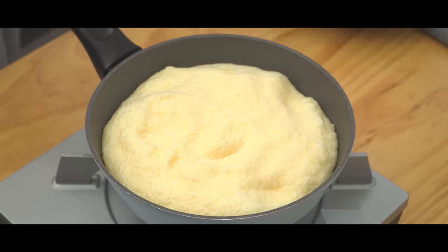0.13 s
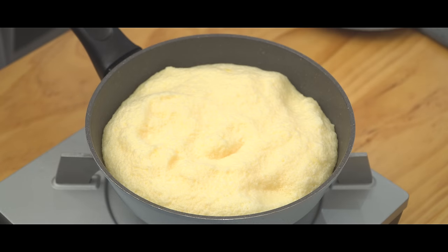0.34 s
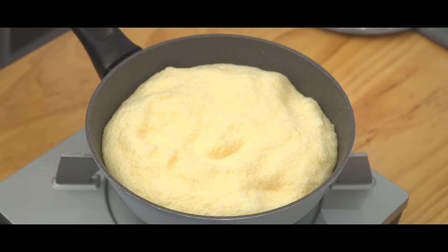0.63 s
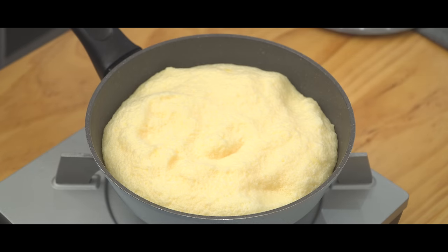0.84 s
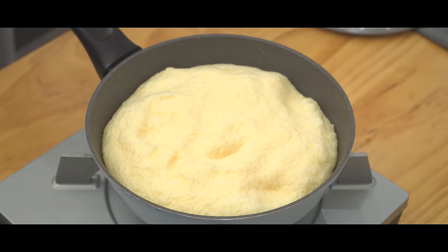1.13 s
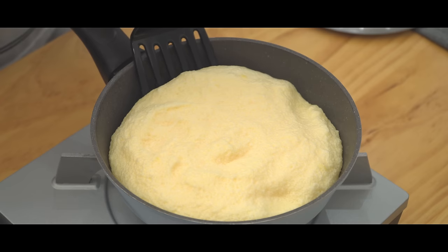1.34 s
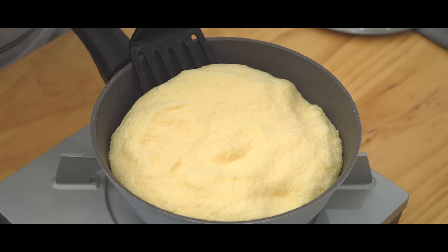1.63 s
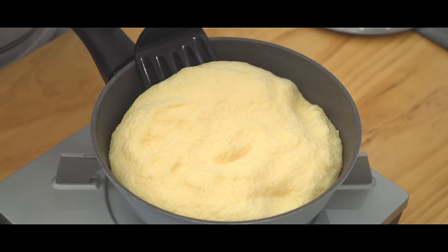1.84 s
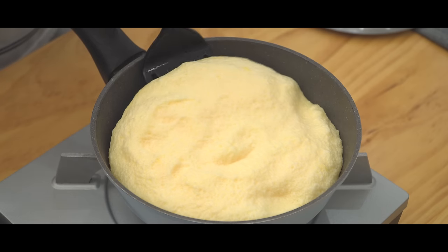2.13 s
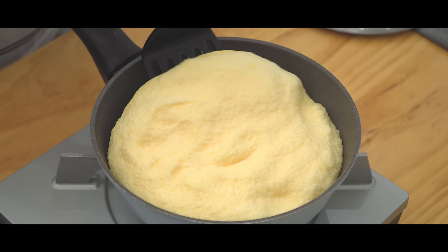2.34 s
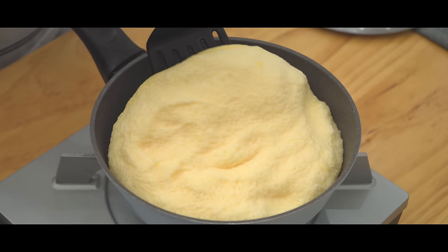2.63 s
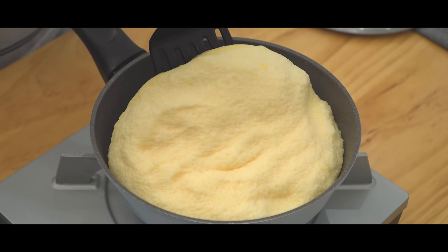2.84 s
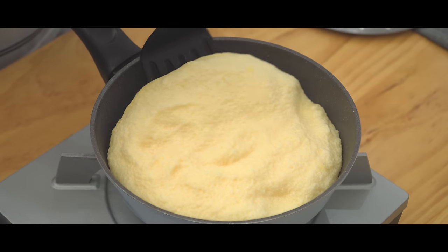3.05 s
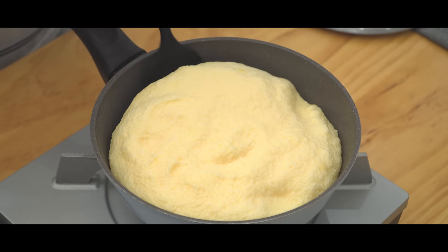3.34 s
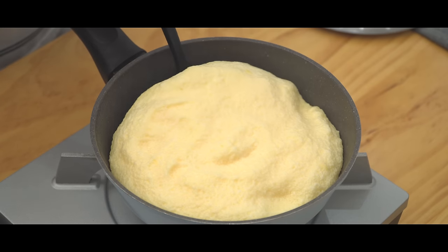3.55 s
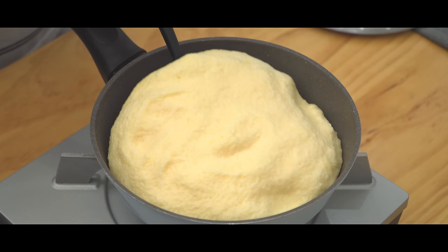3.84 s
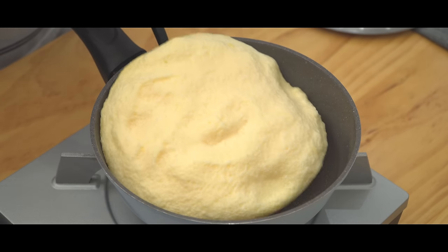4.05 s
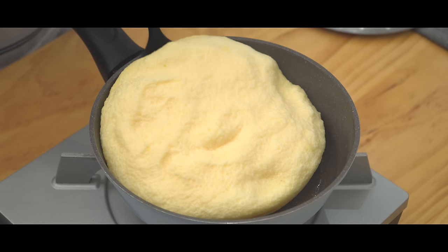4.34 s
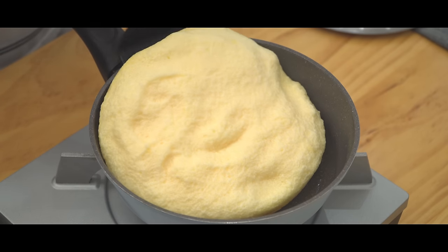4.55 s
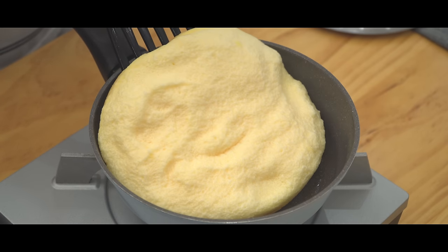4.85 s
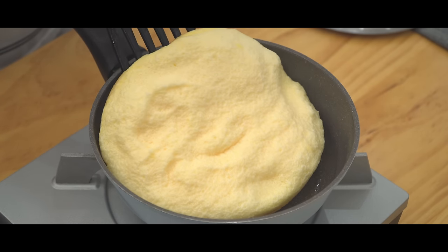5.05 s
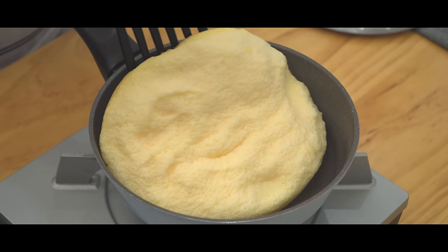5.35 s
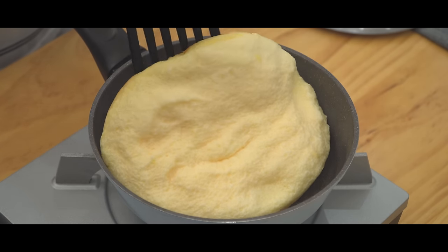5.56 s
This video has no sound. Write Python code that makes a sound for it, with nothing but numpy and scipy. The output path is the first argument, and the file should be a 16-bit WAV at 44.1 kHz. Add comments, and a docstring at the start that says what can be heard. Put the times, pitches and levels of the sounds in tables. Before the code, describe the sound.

Quiet kitchen with faint hum and a thin, regular insect-like chirr. A spatula clatters off a plate slightly away, then knocks a small pan several times, close and dry. The hum steps up, with low handling rumble. Frying swells, the shaft knocks the rim dully, and the blade rubs under the omelette with sharp fat pops, wet crackling and a quick run of snaps. Close microphone, small room reverberation.

```python
"""In a kitchen, a fluffy omelette cooks in a small pan on a portable stove, over mains hum and a faint chirring.
A plastic spatula clatters off a plate, knocks the pan and slides under the egg. Solids sound as decaying
modes plus dense noise bands; the wet underside crackles on hot metal as random grains and peels off in a run
of snaps. Frying swells at each lift of the egg, and fat pops are filtered spikes with a brief spray."""
import sys
import numpy as np
from scipy import signal
from scipy.fft import rfft, irfft
from scipy.io import wavfile

SR = 44100
rng = np.random.default_rng(int(sys.argv[2]) if len(sys.argv) > 2 else 0)


def transcribe(u):
    """Save the signal u as a 16-bit wav file named by the first command-line argument.

    u: samples, shape (n,) or (channels, n), limited to [-1, 1]; the rate is SR.
    q: integer samples, one column per channel.
    """
    v = np.clip(np.atleast_2d(u).T, -1, 1)
    q = np.round(v * 32767).astype(np.int16)
    wavfile.write(sys.argv[1], SR, q)


N = 251037
T = np.arange(N) / SR

# Levels in the tables are relative: most sources apply a further gain of their own.
# steady narrow bands in the background: centre_hz, width_hz, level_db
WHIRR_BANDS = [(2502, 290, -72), (3242, 240, -72), (3983, 190, -73.5), (5276, 280, -72.5), (8300, 190, -88),
               (11170, 100, -84), (12200, 136, -86)]
# spectrum of the room air: frequency_hz, relative_db
AIR_SPECTRUM = [(25, -15), (45, -6), (80, -10.5), (160, -8), (300, -15), (560, -19.5), (940, -18.5),
                (2000, -20.5), (2500, -21), (4600, -26.5), (5600, -21), (6200, -34), (14000, -34.5),
                (16000, -42)]
# spectrum of the handling rumble: frequency_hz, relative_db
HOLDING_SPECTRUM = [(20, -30), (45, -4.5), (90, -8), (250, -10.5), (500, -18.5), (1500, -38.5)]
# spectrum of frying and crackling egg: frequency_hz, relative_db
SIZZLE_SPECTRUM = [(300, -32), (1200, 3), (3500, 4), (6000, 0.5), (8800, 2.5), (12000, -1), (16000, -5.5)]
# lifts of the egg, when fat runs onto bare metal: peak_s, half_length_s, frying_db
EGG_LIFTS = [(2.81, 0.18, -62), (3.966, 0.15, -63.5), (5.13, 0.057, -69), (5.684, 0.14, -74)]
# blows as the spatula leaves the plate: start_s, level_db, plate_ring_db
CLATTER_BLOWS = [(0.6851, -17.5, -3), (0.703, -36, -13), (0.712, -22, -17), (0.725, -23.5, -10),
                 (0.7317, -28, -6.5), (0.776, -39, -10)]
# modes of the plate: frequency_hz, level_db, t60_s
PLATE_MODES = [(527, -3, .26), (565, -3, .24), (633, -8, .42), (735, -14, .24), (790, -9, .22),
               (904, -12, .34), (1022, -11, .5), (1125, -18, .3), (1275, -9, .16), (1313, 0, .27),
               (1422, -6, .3), (1463, -11, .38), (1572, -11, .16), (1720, -4, .15), (1764, -8, .52),
               (1797, -8, .18), (1832, -9, .24), (1950, -12, .22), (2030, -12, .27), (2262, -17, .58),
               (2350, -15, .19), (2837, -23, .52), (3295, -27, .45), (4360, -35, .35), (4732, -36, .25),
               (6180, -40, .25), (6600, -40, .3), (7200, -43, .2)]
# quickly damped modes of the bouncing spatula: frequency_hz, level_db, t60_s
BOUNCE_MODES = [(580, -8.5, 0.055), (934, -4.5, 0.044), (1317, 5.5, 0.043), (1380, -2.5, 0.01),
                (1750, -3.5, 0.05), (2380, -2, 0.02), (3800, -25, 0.037)]
# noise bands of the plate's short clack: frequency_hz, level_db, t60_s
CLACK_BANDS = [(34.8, -35, 0.17), (75, -12.5, 0.23), (116, -16, 0.18), (280, -24, 0.17), (580, -4, 0.058),
               (980, -6, 0.042), (1590, 2.5, 0.042), (2560, -14, 0.058), (4170, -23, 0.035),
               (6940, -34.5, 0.048), (11800, -73, .03)]
# colour of a blow that drives all pitches alike: frequency_hz, level_db
FLAT_COLOUR = [(1000, 0)]
# blade on the pan: start_s, level_db, rattle_db, ring_time_factor,
# thud_db, body_db, ring_db, clack_db, tick_db (a blade left pressed on damps the pan)
BLADE_TAPS = [(1.3254, -20, 1, 1.13, -14, -20.5, -12.5, -15.5, -38),
              (1.692, -13, -4.5, 0.85, -26.5, -20.5, -18, -23, -18.5),
              (1.732, -39.5, 3, 0.88, -7, -13, -7, -30, -74),
              (1.824, -35, -3.5, 1.1, -6, -16, -12, -22, -30),
              (1.934, -15.5, -6.5, 0.71, -15.5, -18, -14, -23.5, -15),
              (2.087, -20.5, -2.5, 0.94, -17, -13.5, -9.5, -17.5, -20),
              (3.267, -17.5, 1.5, .72, -26, -17, -12.5, -17, -21.5)]
# pitches of those five parts: frequency_hz
TAP_PART_HZ = [90, 280, 1200, 3600, 9000]
# modes of the pan on its stove: frequency_hz, level_db, t60_s
PAN_MODES = [(44, -44, 0.22), (152.5, -3.5, 0.15), (215.6, -14.5, 0.15), (365, -5, 0.13),
             (790, -10.5, 0.075), (1056, -4, 0.04), (1310, 3.5, 0.018), (1470, -3, 0.024),
             (1870, -10.5, 0.11), (2024, -3.5, 0.046), (2474, -11.5, 0.13), (3217, -9, 0.051),
             (3690, -4, 0.05), (3720, -2, 0.057), (3920, -4, 0.021), (4450, -6, 0.063), (4880, -2, 0.043),
             (5615, -3, 0.042), (6750, -5.5, 0.034), (7380, -9, 0.027), (7870, -3, 0.04),
             (8370, -7.5, 0.05), (8450, -8, 0.018), (8840, -5, 0.028)]
# noise bands of the rattling blade and pan support: frequency_hz, level_db, t60_s
RATTLE_BANDS = [(40.7, -8, 0.28), (121, -7, 0.32), (302, 5.5, 0.058), (564, -6.5, 0.063),
                (1300, -2.5, 0.078), (2930, 3, 0.034), (6000, 2, 0.02), (9200, 6.5, 0.035),
                (15100, -14, .025)]
# egg and pan settling softly: start_s, level_db, pitch_hz
SETTLING_BUMPS = [(1.68, -37, 302), (3.488, -30, 220), (3.618, -37, 147), (3.771, -39, 168),
                  (4.064, -36, 124), (4.988, -44, 68.6), (5.193, -36, 84)]
# loudest single pops of fat: start_s, level_db, lower_snap_db
FAT_POPS = [(2.2594, -33, 4), (2.2744, -34, -1), (2.449, -33, 1), (3.1835, -32, -8), (3.2087, -29, -8),
            (3.3832, -16.5, -35), (3.3939, -14, -35), (3.419, -19.5, -19), (3.5095, -17, -33),
            (3.5204, -12.5, -41), (3.5932, -24, -27), (3.75, -23, -19), (3.7965, -24, -28),
            (3.8206, -27, -29), (3.838, -26, -14), (4.8675, -40.5, -3.5), (4.909, -38, -0.5),
            (5.0726, -44.5, 6), (5.1024, -42, 10), (5.3672, -44, -2.5), (5.6477, -33.5, -10)]
# spatula shaft on the rim: start_s, level_db, thud_db, body_db, ring_db, clack_db, tick_db
SHAFT_KNOCKS = [(3.162, -19.5, -18, -9.5, -13.5, -19, -36.5), (3.182, -30.5, -9, -17, -9, -35, -19.5),
                (4.338, -14.5, -20, -7, -23, -14, -41.5), (4.416, -22.5, -16, -6, -13.5, -31.5, -34.5)]
# pitches of those five parts: frequency_hz
KNOCK_PART_HZ = [90, 280, 1050, 2000, 9000]
# modes of the plastic shaft: frequency_hz, level_db, t60_s
SHAFT_MODES = [(128, -1, 0.036), (268, 6, 0.035), (440, 0, 0.016), (830, -17, 0.023), (1043, -7, 0.11),
               (1326, -1, 0.016), (1966, 0.5, 0.04), (3080, -17, 0.081), (4050, -1.5, 0.045)]
# noise bands of the shaft's dull contact: frequency_hz, level_db, t60_s
THUD_BANDS = [(40, -11, 0.16), (119, -8.5, 0.18), (296, -19, 0.06), (567, -2.5, 0.031), (1150, -6, 0.058),
              (2400, -2.5, .025), (5000, -10.5, 0.081), (9000, -0.5, 0.024), (15000, -18, .025)]
# blade shoved under the egg: start_s, rise_s, t60_s, rubbing_db, rumble_db
BLADE_SHOVES = [(3.29, .04, 0.64, -60, -49), (3.39, 0.055, 0.67, -51, -46), (3.67, .02, 0.43, -62, -53.5),
                (3.85, 0.027, 0.44, -50.5, -49.5), (4.18, 0.026, 0.5, -58.5, -48)]
# spectrum of the rubbing blade: frequency_hz, relative_db
RUBBING_SPECTRUM = [(300, -2.5), (700, -10), (1100, -3.5), (2000, -4.5), (3500, -12.5), (7000, -21),
                    (14000, -21)]
# spectrum of the rumble of a shove: frequency_hz, relative_db
RUMBLE_SPECTRUM = [(25, -10), (60, 4.5), (130, 1.5), (260, 3.5), (420, -12), (800, -16), (2000, -57)]
# wet egg meeting hot metal: start_s, rise_s, t60_s, level_db
WET_CRACKLES = [(3.364, 0.019, 0.7, -43.5), (3.489, 0.018, 0.42, -48)]
# spectrum of the thinner crackle of the peeling egg: frequency_hz, relative_db
PEELING_SPECTRUM = [(300, -67), (1200, -5.5), (3500, -10), (6000, -14), (8300, 1.5), (11800, 0),
                    (13500, -27), (16000, -33)]
# reverberation of the kitchen: frequency_hz, level_db, t60_s
ROOM_BANDS = [(30.2, -4, 0.69), (100, -17, 0.72), (506, -6.5, 0.49), (1990, -3.5, 0.48), (6000, 3, 0.34),
              (14000, -9.5, 0.2)]

# the spatula first touches the pan here: hum jump, handling rumble and stronger frying start from it
TOUCH_S = 1.32
# the hum before the touch, on the touch, and its ebb afterwards
MAINS_HZ, HUM_IDLE_DB, HUM_TOUCHED_DB, HUM_EBB_DB_PER_S = 100, -61.5, -49.5, 5
# chirring on a steady beat
CHIRP_FIRST_S, CHIRP_PERIOD_S, CHIRP_LENGTH_S, CHIRP_DB = .222, .277, .18, -66
# handling rumble: hands off, spatula put into the pan, and its easing afterwards
HANDS_OFF_DB, HOLDING_DB, EASING_DB_PER_S = -79.5, -58, 1.45
# gentle frying: egg left alone, and the part added when the blade disturbs it
FRY_IDLE_DB, FRY_DISTURBED_DB = -85, -71
# the egg peels off the metal
PEEL_S, PEEL_RISE_S, PEEL_T60_S, PEEL_DB = 3.666, .0052, .49, -42
# the run of snaps as it lets go: mean gap, mean level, relative level of the lower snap
SNAP_GAP_S, SNAP_DB, SNAP_LOW_DB = .007, -26.5, -18

# half-octave bands of unrelated noise at rms 1, the stock for every burst
BAND_HZ = 32 * 2 ** (np.arange(19) / 2)
BANDS = []
for centre_hz in BAND_HZ:
    edges_hz = [centre_hz / 2 ** .25, centre_hz * 2 ** .25]
    band_filter = signal.butter(3, edges_hz, "band", fs=SR, output="sos")
    band_noise = signal.sosfilt(band_filter, rng.standard_normal(N))
    BANDS.append(band_noise / np.sqrt(np.mean(band_noise ** 2) + 1e-20))


def from_db(db):
    """Logarithmic level: decibels to amplitude gain."""
    return 10 ** (np.asarray(db) / 20)


def rms_one(x):
    """Normalisation of power: scale to rms 1."""
    return x / np.sqrt(np.mean(x ** 2) + 1e-20)


def at_hz(rows, hz, column=1):
    """Interpolation on a log-frequency axis: read one column of a table."""
    rows = np.array(rows)
    return np.interp(np.log(hz + 1e-9), np.log(rows[:, 0]), rows[:, column])


def add(track, s, sound):
    """Superposition: mix a sound in at time s."""
    start = max(round(s * SR), 0)
    track[start:start + len(sound)] += sound[:N - start]


def coloured(x, spectrum):
    """Linear filtering: weight the spectrum of x and scale to rms 1."""
    gain = from_db(at_hz(spectrum, np.fft.rfftfreq(N, 1 / SR)))
    return rms_one(irfft(rfft(x) * gain, N))


def narrow_noise(hz, width):
    """Band limitation: noise in one narrow band, at rms 1."""
    sos = signal.butter(2, [hz - width / 2, hz + width / 2], "band", fs=SR, output="sos")
    return rms_one(signal.sosfilt(sos, rng.standard_normal(N)))


def dying(t60):
    """Exponential damping: one second of decay, falling 60 dB in t60."""
    return np.exp(-np.minimum(np.log(1000) * T[:SR] / t60, 30))


def surge(s, rise_s, t60=np.inf):
    """Build-up and damping: gain that rises from time s, then dies away or holds."""
    rise = np.clip((T - s) / rise_s, 0, 1)
    decay = np.log(1000) * np.maximum(T - s - rise_s, 0) / t60
    return rise * np.exp(-np.minimum(decay, 30))


def struck(modes, colour, spread_db, stretch=1):
    """Modal superposition: damped sines after one blow, of alternating sign and random strength."""
    ringing = 0
    for k, (hz, db, t60) in enumerate(modes):
        strength = from_db(db + at_hz(colour, hz) + spread_db * rng.standard_normal())
        ringing += (-1) ** k * strength * dying(t60 * stretch) * np.sin(2 * np.pi * hz * T[:SR])
    return ringing


def burst(table, colour):
    """High modal density: half-octave noises that swell in a cycle and die at their own pace."""
    start = rng.integers(SR // 2, N - SR)
    out = np.zeros(SR)
    for hz, band in zip(BAND_HZ, BANDS):
        level = from_db(at_hz(table, hz) + at_hz(colour, hz))
        swell = np.minimum(T[:SR] * hz, 1)
        out += level * band[start:start + SR] * dying(at_hz(table, hz, 2)) * swell
    return out


def grains(per_s, spread_db, clump_db=0):
    """Random point process: tiny steam bubbles burst in clumps, a few much louder than the rest."""
    sizes = from_db(spread_db * np.minimum(rng.exponential(1, N), 4))
    clumps = from_db(clump_db * np.tanh(narrow_noise(60, 80)))
    return (rng.random(N) < per_s * clumps / SR) * sizes * rng.choice([-1, 1], N)


def hum(rise_s=0.09):
    """Periodic excitation: a mains sine jumps when the spatula meets the pan, then ebbs steadily."""
    touched_db = HUM_TOUCHED_DB - HUM_EBB_DB_PER_S * (T - TOUCH_S)
    db = HUM_IDLE_DB + surge(TOUCH_S, rise_s) * (touched_db - HUM_IDLE_DB)
    return from_db(db) * np.sqrt(2) * np.sin(2 * np.pi * MAINS_HZ * T)


def background(air_db=-60):
    """Stationary noise: broadband room air and a thin whirr of narrow bands, with the mains hum."""
    air = from_db(air_db) * coloured(rng.standard_normal(N), AIR_SPECTRUM)
    whirr = sum(from_db(db) * narrow_noise(hz, width) for hz, width, db in WHIRR_BANDS)
    return air + whirr + hum()


def holding():
    """Structure-borne rumble: low noise rises as the spatula is put into the pan, then eases."""
    eased = from_db(HOLDING_DB - EASING_DB_PER_S * (T - TOUCH_S))
    held = from_db(HANDS_OFF_DB) + eased * surge(TOUCH_S, rise_s=0.022)
    return coloured(rng.standard_normal(N), HOLDING_SPECTRUM) * held


def frying_gain(onset_s=1.0):
    """Boiling on contact: frying picks up from the first touch, and swells at each lift of the egg."""
    lifted = sum(from_db(db) * np.exp(-((T - s) / half_s) ** 2) for s, half_s, db in EGG_LIFTS)
    return from_db(FRY_IDLE_DB) + from_db(FRY_DISTURBED_DB) * surge(TOUCH_S, onset_s) + lifted


def gentle_frying():
    """Bubble noise: sparse random grains under the changing frying gain."""
    return coloured(grains(per_s=1500, spread_db=6.0), SIZZLE_SPECTRUM) * frying_gain()


def insect(hz=5510, width=280, edge_s=0.11, waver_db=2.0):
    """Amplitude modulation: gated narrow noise chirrs between three and four times a second."""
    gate = np.zeros(N)
    for s in np.arange(CHIRP_FIRST_S - CHIRP_PERIOD_S, T[-1] + CHIRP_PERIOD_S, CHIRP_PERIOD_S):
        level = from_db(CHIRP_DB + waver_db * rng.standard_normal())
        gate += level * np.clip((CHIRP_LENGTH_S / 2 - abs(T - s)) / edge_s + .5, 0, 1)
    return gate * narrow_noise(hz, width)


def plate(ring_db=-1, bounce_db=3, clack_db=2):
    """Impact excitation: the first blow sets the plate ringing; the bouncing spatula mostly clacks."""
    out = np.zeros(N)
    for s, db, plate_db in CLATTER_BLOWS:
        ring = from_db(ring_db + plate_db) * struck(PLATE_MODES, FLAT_COLOUR, spread_db=-1.3)
        bounce = from_db(bounce_db) * struck(BOUNCE_MODES, FLAT_COLOUR, spread_db=2.5)
        clack = from_db(clack_db) * burst(CLACK_BANDS, FLAT_COLOUR)
        add(out, s, from_db(db) * (ring + bounce + clack))
    return out


def taps(ring_db=4, contact_s=.0018, flex_s=0.00088):
    """Compliant impact: the blade flexes, so force builds gradually as the pan rings and blade rattles."""
    out = np.zeros(N)
    build = 1 - np.exp(-T[:SR] / flex_s)
    for s, db, loose_db, stretch, *parts in BLADE_TAPS:
        colour = [(hz, db + part_db) for hz, part_db in zip(TAP_PART_HZ, parts)]
        ring = from_db(ring_db) * struck(PAN_MODES, colour, spread_db=1.0, stretch=stretch)
        rattle = from_db(loose_db) * burst(RATTLE_BANDS, colour)
        add(out, s + contact_s, build * (ring + rattle))
    return out


def bumps(t60=0.028):
    """Heavily damped resonance: egg and pan settle with short low sines."""
    out = np.zeros(N)
    for s, db, hz in SETTLING_BUMPS:
        add(out, s, from_db(db) * dying(t60) * np.sin(2 * np.pi * hz * T[:SR]))
    return out


def peel_snaps(count=8):
    """Stick-and-release: the peeling egg lets go in snaps uneven in spacing and strength."""
    chance = rng.uniform(-1, 1, (count, 2))
    times = PEEL_S + np.cumsum(SNAP_GAP_S * (1 + 0.36 * chance[:, 0]))
    levels_db = SNAP_DB + 3 * chance[:, 1]
    return [(s, db, SNAP_LOW_DB) for s, db in zip(times, levels_db)]


def pops(tick_db=3, snap_db=14, spray_db=-17, spray_t60=0.0078):
    """Impulsive release: a bursting bubble is a sharp spike and brief spray, heard as tick and lower snap."""
    out = np.zeros(N)
    tick_filter = signal.butter(1, (6000, 13000), "band", fs=SR, output="sos")
    snap_filter = signal.butter(1, (1300, 5500), "band", fs=SR, output="sos")
    for s, db, low_db in FAT_POPS + peel_snaps():
        pop = from_db(spray_db) * rng.standard_normal(SR) * dying(spray_t60) + 1e-18
        pop[0] -= 1  # the pressure spike
        tick = from_db(tick_db) * signal.sosfilt(tick_filter, pop)
        snap = from_db(snap_db + low_db) * signal.sosfilt(snap_filter, pop)
        add(out, s + .0007, from_db(db) * (tick + snap))
    return out


def knocks(ring_db=4, contact_s=0.00129):
    """Bending vibration: the shaft rings low when it meets the rim, with dull contact noise."""
    out = np.zeros(N)
    for s, db, *parts in SHAFT_KNOCKS:
        colour = [(hz, db + part_db) for hz, part_db in zip(KNOCK_PART_HZ, parts)]
        ring = from_db(ring_db) * struck(SHAFT_MODES, colour, spread_db=1.2)
        add(out, s + contact_s, ring + burst(THUD_BANDS, colour))
    return out


def shove_rumble(rumble_db=-1):
    """Low-frequency friction: each push of the egg gives a surge of rumbling noise."""
    shoved = sum(from_db(db + rumble_db) * surge(s, rise_s, t60) for s, rise_s, t60, _, db in BLADE_SHOVES)
    return coloured(rng.standard_normal(N), RUMBLE_SPECTRUM) * shoved


def rubbing(rub_db=-2):
    """Sliding friction: dense grains surge as the blade is shoved under the egg."""
    shoved = sum(from_db(db) * surge(s, rise_s, t60) for s, rise_s, t60, db, _ in BLADE_SHOVES)
    return from_db(rub_db) * coloured(grains(per_s=6100, spread_db=4.0), RUBBING_SPECTRUM) * shoved


def crackling(crackle_db=-1):
    """Flash boiling: wet egg meets hot metal in surges of clumped grains."""
    wetted = sum(from_db(db) * surge(s, rise_s, t60) for s, rise_s, t60, db in WET_CRACKLES)
    crackle = coloured(grains(per_s=3800, spread_db=4.0, clump_db=6.5), SIZZLE_SPECTRUM)
    return from_db(crackle_db) * crackle * wetted


def peeling():
    """Adhesive release: the egg leaves the metal in a thinner, more clumped crackle."""
    crackle = coloured(grains(per_s=1900, spread_db=6.5, clump_db=10.0), PEELING_SPECTRUM)
    return from_db(PEEL_DB) * crackle * surge(PEEL_S, PEEL_RISE_S, PEEL_T60_S)


def kitchen(x, wet_db, first_echo_s=0.011):
    """Diffuse reverberation: convolve with a noise tail whose decay time depends on frequency."""
    tail = burst(ROOM_BANDS, FLAT_COLOUR) * (T[:SR] > first_echo_s)
    tail /= np.linalg.norm(tail)
    return x + from_db(wet_db) * signal.fftconvolve(x, tail)[:N]


def scene():
    """Direct and reverberant fields: the plate, farther off, has the most reverberation."""
    far = kitchen(plate(), wet_db=-14.0)
    egg = gentle_frying() + rubbing() + crackling() + peeling()
    near = kitchen(taps() + egg + pops(), wet_db=-16.0)
    near += kitchen(knocks(), wet_db=-20.5)
    handling = holding() + bumps() + shove_rumble()
    return (far + near + handling + insect() + background())[None]


def record(dry, dip_db=-8.5):
    """Gain and band limitation: the level dips around the clatter; deepest bass and top are cut."""
    dip = np.interp(T, [.572, .592, .950, .959], [0, 1, 1, 0])
    bass_cut = signal.butter(3, 38, "high", fs=SR, output="sos")
    top_cut = signal.ellip(10, .2, 80, 16200, fs=SR, output="sos")
    x = signal.sosfilt(bass_cut, dry * from_db(dip_db * dip))
    return signal.sosfilt(top_cut, x)


dry = scene()
out = record(dry)
transcribe(out)
```